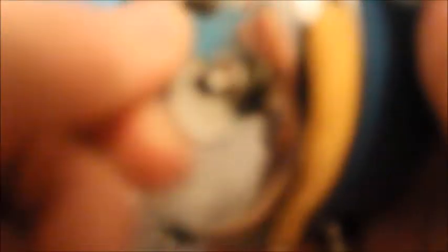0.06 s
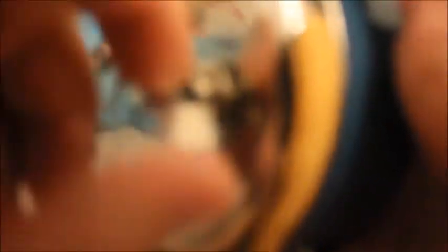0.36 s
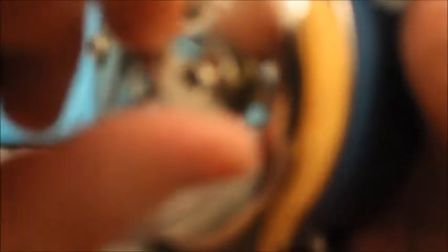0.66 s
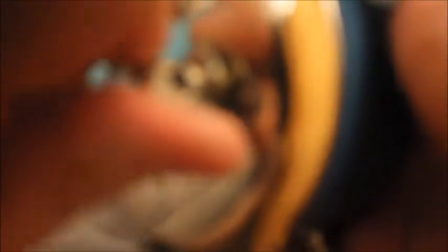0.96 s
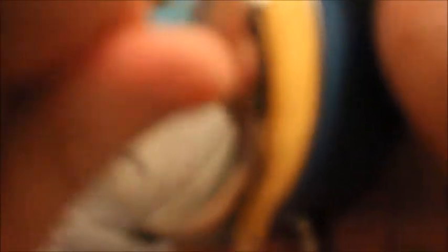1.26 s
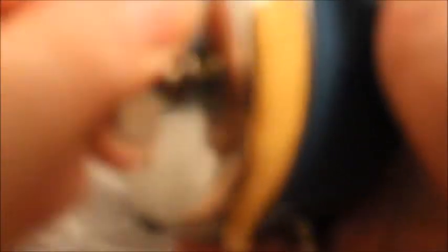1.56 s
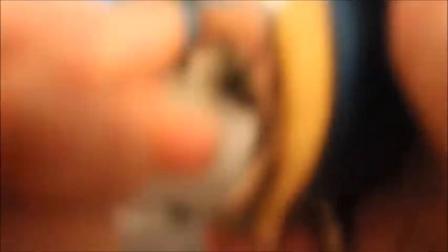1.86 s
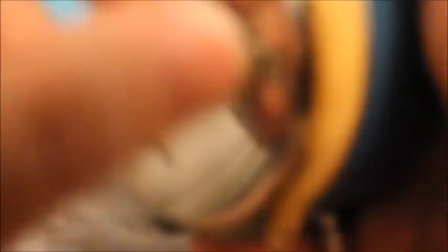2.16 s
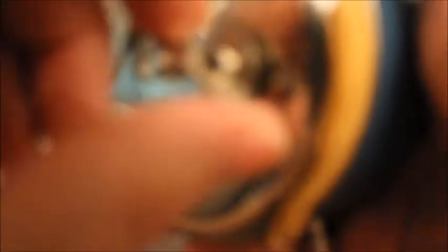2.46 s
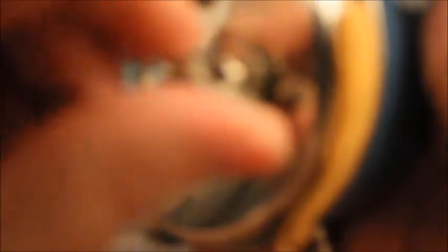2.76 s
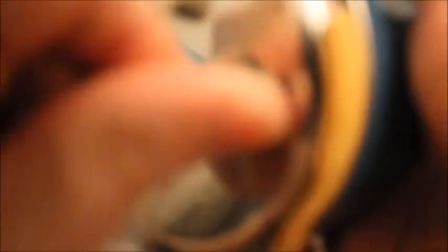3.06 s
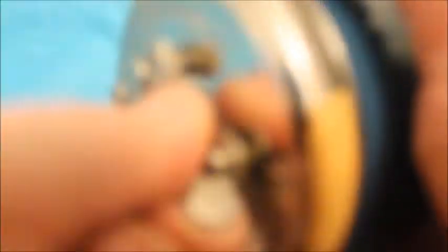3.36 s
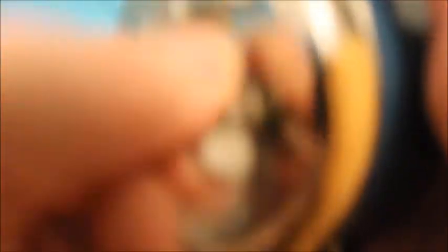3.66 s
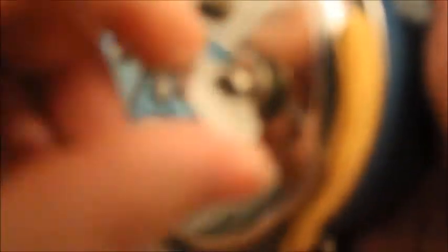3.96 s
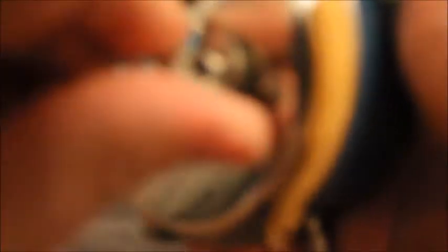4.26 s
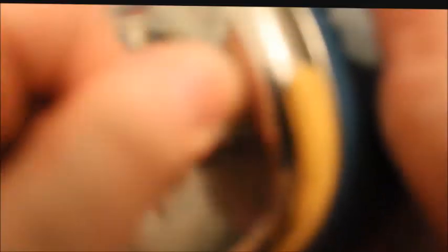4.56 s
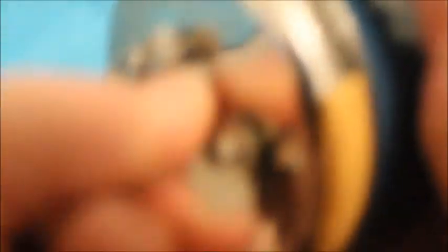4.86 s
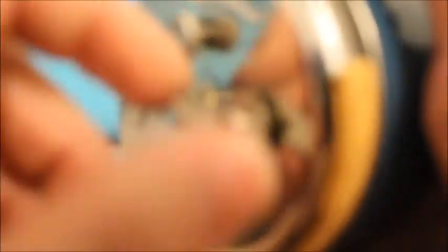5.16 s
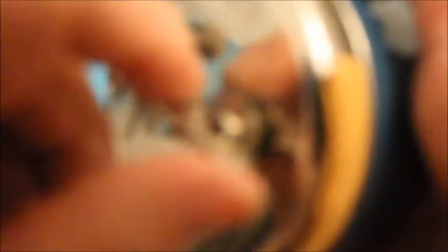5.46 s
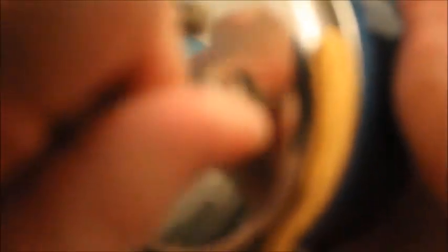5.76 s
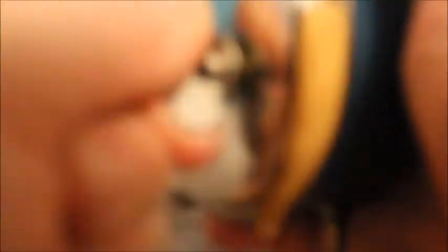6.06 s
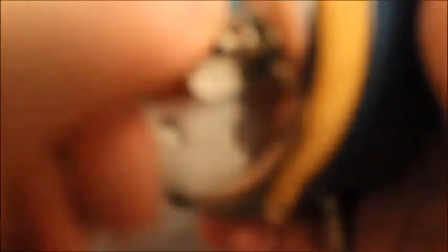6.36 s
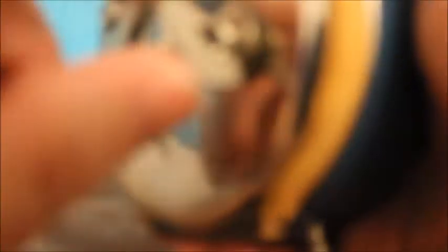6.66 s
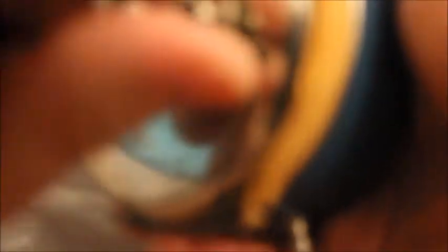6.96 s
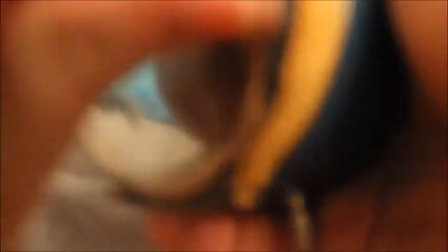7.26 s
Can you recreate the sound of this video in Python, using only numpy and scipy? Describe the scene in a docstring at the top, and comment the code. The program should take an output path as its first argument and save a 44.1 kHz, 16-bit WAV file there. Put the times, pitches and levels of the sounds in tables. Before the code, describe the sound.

A mechanical alarm clock is wound by hand in short bursts of quickening ratchet clicks, with key knocks and faint ticking between.

```python
"""A small quiet room, where a mechanical alarm clock is wound by hand close to the microphone.
With each turn of the key the pawl snaps over the ratchet teeth, gathering speed and ringing the movement
plate. Between turns the loose key knocks as the fingers let go, slide and grip again. The escapement keeps
a faint tick-tock throughout, and every metal contact leaves a ring in the frame and bells."""
import sys
import numpy as np
from scipy import signal
from scipy.fft import rfft, irfft
from scipy.io import wavfile
from scipy.ndimage import uniform_filter1d

SR = 44100
rng = np.random.default_rng(int(sys.argv[2]) if len(sys.argv) > 2 else 0)


def wav_record(signal):
    """Record a signal, one row per channel, as 16-bit PCM in the file named by sys.argv[1]."""
    frames = np.transpose(np.atleast_2d(signal))
    bounded = np.clip(frames, -1, 1)
    # unit amplitude maps onto the largest positive 16-bit level
    quanta = np.round(bounded * 32767).astype(np.int16)
    wavfile.write(sys.argv[1], SR, quanta)


N = 331632
TIME = np.arange(N) / SR
CUTOFF_HZ = 15900
RING_SIZE = 4096   # samples in the ring of one blow
RING_HZ = np.arange(RING_SIZE // 2 + 1) * SR / RING_SIZE
DELAY = np.exp(-2j * np.pi * RING_HZ / SR)   # one sample's delay at each frequency


def from_db(db):
    return 10 ** (np.asarray(db) / 20)


def rms_one(x):
    return x / np.sqrt(np.mean(x ** 2) + 1e-20)


def add(out, s, sound):
    """Mix a sound in from time s."""
    at = max(round(s * SR), 0)
    out[at:at + len(sound)] += sound[:max(N - at, 0)]


def coloured_noise(spectrum):
    """Noise shaped by a curve of (frequency [Hz], level [dB]); rms 1."""
    hz, db = np.transpose(spectrum)
    bins = np.maximum(np.arange(N // 2 + 1) * SR / N, 1)
    colour = from_db(np.interp(np.log(bins), np.log(hz), db))
    return rms_one(irfft(rfft(rng.standard_normal(N)) * colour, N))


def through(x, body):
    """A sound drives a set of resonators side by side."""
    return sum(from_db(db) * signal.lfilter(*signal.iirpeak(hz, hz / width, fs=SR), x)
               for hz, width, db in body)


def poles(hz, width_hz):
    """Radius and feedback response of two-pole resonators, one row each."""
    r = np.exp(-np.pi * np.abs(width_hz) / SR)[:, None]
    return r, 1 - 2 * r * np.cos(2 * np.pi * hz[:, None] / SR) * DELAY + (r * DELAY) ** 2


def resonances(hz, width_hz):
    """Responses of a body's modes, gain 1 at the peak, signs alternating."""
    r, feedback = poles(hz, width_hz)
    signs = (-1) ** np.arange(len(hz))[:, None]
    return (1 - r * r) / 2 * (1 - DELAY ** 2) / feedback * signs


def dispersion(width_hz, allpasses):
    """Bending waves scatter in thin metal: random allpasses smear a blow over a few milliseconds."""
    hz = (np.arange(allpasses) + 2 * rng.random(allpasses)) * CUTOFF_HZ / allpasses
    _, feedback = poles(hz, width_hz * (.5 + rng.random(allpasses)))
    return np.prod(np.conj(feedback) * DELAY ** 2 / feedback, axis=0)


def contact_db(hz, bass_db, treble_db, varied_db):
    """A heavy contact favours the low modes, a hard one the high modes; no two land on the same spot."""
    body_hz, body_octaves, treble_hz = 757, 1.01, 5950
    body = np.exp(-(np.log2(hz / body_hz) / body_octaves) ** 2)
    edge = 1 / (1 + (treble_hz / hz) ** 4)
    return bass_db * body + treble_db * edge + varied_db * rng.standard_normal(len(hz))


def blows(events, body, gain_db, scatter_hz, varied_db, allpasses):
    """Each contact sets all the modes of one body ringing."""
    hz, width, mode_db = np.transpose(body)
    modes, out = resonances(hz, width), np.zeros(N)
    for s, db, bass_db, treble_db in events:
        strengths = from_db(db + mode_db + contact_db(hz, bass_db, treble_db, varied_db))
        add(out, s, irfft(strengths @ modes * dispersion(scatter_hz, allpasses)))
    return from_db(gain_db) * out


def room_tone(level_db):
    """A steady bed of still room and microphone hiss."""
    # noise floor: (frequency [Hz], relative density [dB])
    floor = [(15, -48), (25, -29.5), (127, -12.5), (161, -12.5), (236, -3.5), (293, -5), (326, -4),
             (641, -7), (754, -7.5), (818, -6.5), (1040, -11), (1790, -13.5), (2610, -18), (7310, -27.5),
             (16000, -37.5)]
    return from_db(level_db) * coloured_noise(floor)


def diffuse_tail(build_s):
    """The room's scattered sound swells and dies away, each band at its own rate."""
    # room tail: (frequency [Hz], band level [dB], time to fall 60 dB [s])
    decay = [(250, -12, .4), (900, -12, 0.38), (1570, -5.5, 0.23), (2250, -13, 0.33), (3000, -12.5, 0.44),
             (4190, -9.5, 0.24), (4950, -11.5, 0.3), (6050, -9.5, 0.48), (8300, -14.5, 0.28),
             (11500, -12.5, 0.36), (15000, -14.5, .26)]
    hz, level_db, t60 = np.transpose(decay)
    age = TIME[:SR // 2]
    edges, response = np.geomspace(150, CUTOFF_HZ, 28), np.zeros(len(age))
    for low, high in zip(edges, edges[1:]):
        db, ring_s = (np.interp(np.log(low * high) / 2, np.log(hz), column) for column in (level_db, t60))
        fade = from_db(-60 * age / ring_s) * (1 - np.exp(-(age / build_s) ** 2))
        band = signal.butter(2, [low, high], "band", fs=SR, output="sos")
        wash = signal.sosfilt(band, rng.standard_normal(len(age)) * fade)
        response += from_db(db) * wash / np.linalg.norm(fade)
    return response


def room(x, build_s, echo_db, sway_hz):
    """A few distinct reflections, then a tail that keeps changing as hand and clock move."""
    # reflections from table and walls: (delay [s], relative level [dB])
    echoes = [(.0052, -18.5), (.0075, -30), (.0124, -18), (.0207, -33.5), (.0242, -28.5), (.0312, -45)]
    sway = 2 * np.pi * sway_hz * TIME
    tail = sum(signal.fftconvolve(x * share, diffuse_tail(build_s))[:N]
               for share in (np.cos(sway), np.sin(sway)))
    out = x + tail
    for delay_s, db in echoes:
        add(out, delay_s, from_db(db + echo_db) * x)
    return out


def finger_slides(attack_s, release_s, stick_db):
    """Skin sticks and slips on the metal while the fingers shift their grip."""
    # finger strokes: (start [s], end [s], hiss [dB], rustle [dB])
    strokes = [(0.0, 0.27, -54.5, -63), (2.062, 2.205, -56, -57.5), (2.665, 2.775, -62, -55),
               (3.754, 3.913, -67, -59), (5.094, 5.166, -56.5, -70), (6.453, 6.562, -55.5, -59),
               (6.582, 6.652, -82, -51)]
    # metal rubbed by skin: (frequency [Hz], width [Hz], level [dB])
    rub_modes = [(3460, 480, -0.5), (5640, 200, 3.5), (6400, 350, 3), (7300, 300, 0), (7830, 380, 0.5),
                 (9000, 900, -5), (10000, 500, -7), (11750, 500, -5), (13100, 900, -5), (15300, 800, -9)]
    # soft rustle of the fingertips: (frequency [Hz], relative density [dB])
    rustle_colour = [(150, -9), (400, 4), (900, 1), (1450, -1), (2200, -9), (6000, -31)]
    hiss, rustle = np.zeros(N), np.zeros(N)
    for start, end, hiss_db, rustle_db in strokes:
        pressure = np.clip(np.minimum((TIME - start) / attack_s, .5 + (end - TIME) / release_s), 0, 1)
        hiss += from_db(hiss_db) * pressure
        rustle += from_db(rustle_db) * pressure
    grip = from_db(stick_db * rms_one(uniform_filter1d(rng.standard_normal(N), size=400)))
    rubbed_metal = rms_one(through(rng.standard_normal(N), rub_modes))
    return grip * (hiss * rubbed_metal + rustle * coloured_noise(rustle_colour))


def hand_bumps(gain_db):
    """The whole clock jolts in the hand, which damps it at once."""
    # the clock rocking against the hand: (frequency [Hz], width [Hz], level [dB])
    rock_modes = [(90, 28, -1), (129.5, 50, 8.5), (208, 91, 2), (426, 280, -20)]
    # dull bumps: (time [s], relative peak [dB])
    jolts = [(1.3148, -34.5), (1.327, -43), (1.767, -47), (4.7257, -28.5), (6.155, -49)]
    thud, out = through(signal.unit_impulse(RING_SIZE), rock_modes), np.zeros(N)
    for s, db in jolts:
        add(out, s, from_db(db + gain_db) * thud / np.abs(thud).max())
    return out


def frame_ring(contacts, gain_db):
    """Frame and bells ring on in sympathy after every blow."""
    # lasting rings: (frequency [Hz], width [Hz], level [dB])
    frame_modes = [(1285, 7.5, -2), (2160, 14, -18.5), (2266, 30, -4.5), (2418, 11, 5.5), (3200, 22, -24),
                   (3700, 18, -0.5), (4500, 16, -9), (6420, 32, 7), (6800, 30, -10), (8300, 50, -13.5),
                   (9200, 35, -3), (13200, 60, -7.5)]
    return from_db(gain_db) * through(contacts, frame_modes)


def every_swing(contacts, swing_s=.608):
    """The same contacts come round with each swing of the balance, a little early or late."""
    # handling pushes the balance off its beat: (time [s], lag [s], strength [dB])
    drift = [(.32, 0.000066, 3.5), (0.938, 0.002, -0.5), (2.152, -0.0055, 1.3), (2.76, -.0028, -0.5),
             (3.1, -.004, -4), (3.69, 0.013, -6.5), (3.961, -0.0018, 1.5), (4.3, -0.0006, -1),
             (4.9, 0.0036, -10), (5.19, -.002, 4.5), (5.51, 0.0022, 2), (5.8, .0195, 0), (6.4, -0.0062, -3),
             (6.72, -0.00028, 2), (7.021, 0.0012, 1), (7.33, 0, -22)]
    at, lag_s, strength_db = np.transpose(drift)
    repeats = [(start + s, *rest) for start in np.arange(0, N / SR, swing_s) for s, *rest in contacts]
    return [(s + np.interp(s, at, lag_s), db + np.interp(s, at, strength_db), bass_db, treble_db)
            for s, db, bass_db, treble_db in repeats if s < N / SR]


def balance_scratch():
    """A thin scratch in each half swing, probably the hairspring."""
    # scratches of the first swing: (time [s], level [dB], bass [dB], treble [dB])
    scratches = [(.25, -18, 0, -1.5), (.526, -17.5, 0, 0)]
    # their wiry ring: (frequency [Hz], width [Hz], level [dB])
    modes = [(7300, 274, -0.5), (7900, 500, -5.5), (15300, 900, -9)]
    return blows(every_swing(scratches), modes, gain_db=-1.0, scatter_hz=150, varied_db=1.0, allpasses=28)


def escapement():
    """Each swing sounds through the case: unlock, tick, two rebounds; unlock, tock, one rebound."""
    # contacts of the first swing: (time [s], level [dB], bass [dB], treble [dB])
    beat = [(.285, -24, 6, 2), (.3255, -9.5, -3, -4), (.3325, -14, -9, -1), (.347, -24, -3.5, 2.5),
            (.6105, -25, 6, 5), (.6475, -11, 7, 6.5), (.6545, -20, 6, -1)]
    # ring of the case: (frequency [Hz], width [Hz], level [dB])
    case_modes = [(709, 57, 9), (1030, 34, 7.5), (1440, 140, 0.3), (1768, 62, 4), (2200, 620, -0.5),
                  (2480, 128, 9.5), (2865, 430, 0.5), (3430, 48, 6.5), (3620, 130, 4), (4270, 250, 2),
                  (4830, 145, 2.5), (6700, 360.0, -4.5), (6800, 156.0, 1), (7560, 280, 0.5),
                  (8150, 280, -2.5), (9600, 1500, -7), (11100, 1243.0, -9.5), (13100, 812.0, -10),
                  (14930.0, 886.0, -10)]
    return blows(every_swing(beat), case_modes, gain_db=-0.5, scatter_hz=107, varied_db=1.5, allpasses=28)


def loose_key(touch_db, touch_treble_db):
    """Amid light metal clicks, the key, loose on its arbor, touches and knocks home milliseconds later."""
    # single light clicks and rattles of key and clock: (time [s], level [dB], bass [dB], treble [dB])
    clicks = [(0.0882, -7, 1, 3), (1.984, -21, -2, 14), (2.0087, -5.5, -11, 0.5), (3.733, -18.5, -2, 3.5),
              (4.7176, 4.5, -12, -3), (5.0266, -18, -4, 3.5), (5.2115, -22, 11, -2), (5.8318, -4.5, 2, -15),
              (5.843, -14, 1, 4), (6.386, -17, -2, 7), (6.553, -17, 15, -12), (6.8243, -14.5, -22, -7)]
    # knocks: (time [s], level [dB], bass [dB], treble [dB], lead of first touch [s], its bass [dB])
    knocks = [(0.0393, 0.5, -1, 4, .0087, 5.5), (1.1637, 2, 10, -3, 0.0068, -15),
              (1.327, 2.5, 0, -1, .0138, 4), (1.942, -3, 0, 2.5, 0.0067, 0), (3.086, 6, 1.5, 4, 0.0087, -9),
              (3.648, -6.5, 9, 2.5, .0038, 8), (3.8086, -4, -2, 5, .0056, -9),
              (4.4591, 4, -5, -1, .011, -9), (4.954, -4, 5.5, 1.5, .0045, 7), (6.352, 0, 0.5, 1, 0.0045, 3),
              (7.266, 4, -4, 0, 0.0043, -3)]
    # ring of key and back cover: (frequency [Hz], width [Hz], level [dB])
    key_modes = [(414, 96, 1.5), (670, 68, 9.5), (733, 130, 6), (990, 460, 8), (1392, 800, 6.5),
                 (1430, 370, 3.5), (2020, 92, 7), (2303, 140, 11), (2768, 143, 7.5), (3500, 250, 3.5),
                 (3623, 71, 6.5), (4000, 390, 1.5), (5260, 384.0, -3), (5800, 270, -6.5),
                 (6280, 499.0, -6.5), (7360, 527.0, -3.5), (8540, 260, -0.5), (9300, 790, -6),
                 (11030, 1650, -8), (13700, 2700, -11)]
    contacts = list(clicks)
    for s, db, bass_db, treble_db, lead_s, touch_bass_db in knocks:
        contacts.append((s - lead_s, db + touch_db, touch_bass_db, treble_db + touch_treble_db))
        contacts.append((s, db, bass_db, treble_db))
    return blows(contacts, key_modes, gain_db=0.0, scatter_hz=278, varied_db=2.0, allpasses=12)


def rebound(share, delay_s):
    """The pawl bounces once, cutting ripples into the snap's colour while its energy stays the same."""
    strength, lag = np.array([share, delay_s * SR]) * (.5 + rng.random(2))
    return (1 + rng.choice([-1, 1]) * strength * DELAY ** round(lag)) / np.hypot(1, strength)


def pawl(gain_db, scatter_hz, varied_db, detune):
    """The pawl drops off each tooth onto the plate, whose ring changes as the key comes round."""
    # movement plate: (frequency [Hz], width [Hz], level [dB], change late in the turn [dB])
    plate_modes = [(750, 410, -11.5, 1.5), (1105, 160, -2, 3), (1430, 260, -2.5, -1.1),
                   (1737, 230, 2.5, -6), (2104, 310, 5.5, -4), (2273, 156, 8.0, -1), (2967, 253.0, -3, 4),
                   (3334, 100, 1.5, 4.5), (3710, 430, -2, -2), (4096, 98, 2, -4.5), (4350, 130, -3, -0.6),
                   (4780, 230, -0.3, 2), (5030, 235, 1.5, -1), (6110, 450, -6.5, 2.5), (6830, 96, 1, -3.5),
                   (7210, 175, 3.5, -2.5), (8060, 3000, 0, -1.7), (8250, 320, 8, 0.3), (8600, 290, 5, -4),
                   (9480, 310, -0.5, 7.5), (9790, 250, 5.5, 2), (10250, 540, 4.5, -1), (10850, 82, 8, -1),
                   (11370, 300, -4.5, 3), (11500, 280, 5, -0.5), (12500, 673.0, 0, 0.5),
                   (13670, 340, 7.5, -3.5), (14600, 530, -2.5, 5), (14731.0, 830, -11.5, 9),
                   (15500, 540, -1.5, 2.5)]
    # key turns: (start [s], end [s], bass [dB], treble [dB], click spring [dB], ring changes at [teeth])
    turns = [(1.2, 1.3, 0.5, -0.8, 9.5, 3), (1.45, 1.9, -1.5, -.6, 6.5, 2.6),
             (3.15, 3.6, 1.3, 1.3, -7, 2.5), (4.5, 4.9, -1, 0.7, 2.5, 3.3), (5.9, 6.3, 3, 2, 0.5, 3.1),
             (7.3, 7.55, 3.5, 1.5, 7.5, 1.4)]
    # the pawl drops off a tooth: (time [s], level [dB])
    snaps = [(1.2489, 10), (1.4917, 11.3), (1.5994, 12), (1.682, 12.5), (1.7335, 12), (1.765, 11.5),
             (1.7949, 10), (1.8293, 10.5), (3.2133, 9), (3.2979, 9), (3.3557, 9), (3.407, 8.5), (3.449, 10),
             (3.49, 11.5), (3.532, 9.5), (4.5497, 9), (4.6303, 8.5), (4.6852, 10.5), (4.7248, 10.5),
             (4.7543, 9.5), (4.781, 10.5), (4.8083, 10), (4.8479, 10), (5.9599, 7.5), (6.0271, 9.5),
             (6.075, 8), (6.1167, 8), (6.1548, 8.5), (6.188, 8.5), (6.2316, 9), (7.3627, 7.5), (7.4343, 9),
             (7.5, 9.5)]
    change_teeth, early_share = 0.196, 0.18   # span of the ring's change; share there from the start
    late_spring_db, late_treble_db = -1.5, 1.2   # late in a turn: less click spring, a harder snap
    rush_bass_db, last_bass_db = 2, -1.5   # the rushing key thumps; the hand eases off on the last tooth
    hz, width, mode_db, late_db = np.transpose(plate_modes)
    spring = np.exp(-((hz - 7100) / 550) ** 2)   # the click spring's band
    out = np.zeros(N)
    for start, end, bass_db, treble_db, spring_db, change_tooth in turns:
        teeth = [row for row in snaps if start <= row[0] < end]
        for tooth, (s, db) in enumerate(teeth):
            late = 1 / (1 + np.exp((change_tooth - tooth) / change_teeth))
            thump_db = bass_db + late * (rush_bass_db + last_bass_db * (tooth == len(teeth) - 1))
            edge_db = treble_db + (late - .5) * late_treble_db
            colour_db = (mode_db + np.interp(late, [0, 1], [early_share, 1]) * late_db
                         + spring * (spring_db + late * late_spring_db)
                         + contact_db(hz, thump_db, edge_db, varied_db))
            loaded_hz = hz * (1 + detune * rng.standard_normal(len(hz)))   # the load nudges each mode
            snap = rebound(share=0.48, delay_s=.0014) * dispersion(scatter_hz, allpasses=16)
            add(out, s, irfft(from_db(db + colour_db) @ resonances(loaded_hz, width) * snap))
    return from_db(gain_db) * out


def scene():
    """Ratchet, key and escapement ring through one frame; fingers and room tone lie underneath."""
    ratchet = pawl(gain_db=-0.5, scatter_hz=486, varied_db=1.0, detune=0.0088)
    key = loose_key(touch_db=-3, touch_treble_db=-10.5)
    contacts = ratchet + key + escapement() + balance_scratch()
    clock = contacts + frame_ring(contacts, gain_db=-3.0) + hand_bumps(gain_db=1.0)
    fingers = finger_slides(attack_s=0.0035, release_s=0.046, stick_db=2.0)
    background = fingers + room_tone(level_db=-52)
    return (room(clock, build_s=0.00112, echo_db=1.0, sway_hz=4.7) + background)[None]


def record(dry):
    """A steep low-pass takes off the very top."""
    return signal.sosfilt(signal.ellip(8, .2, 66, CUTOFF_HZ, fs=SR, output="sos"), dry)


dry = scene()
out = record(dry)
wav_record(out)
```